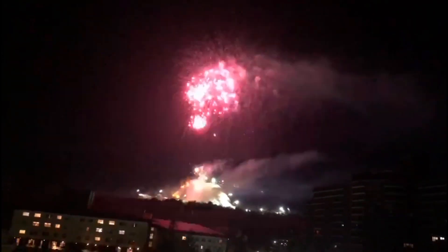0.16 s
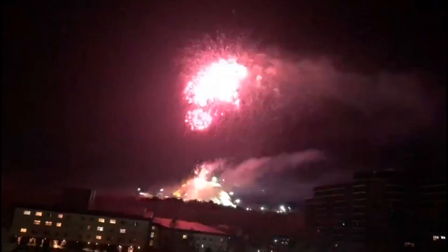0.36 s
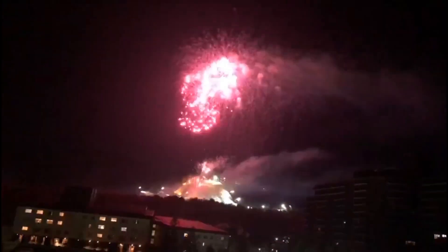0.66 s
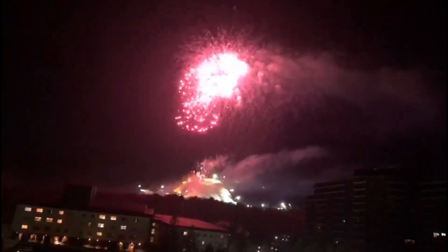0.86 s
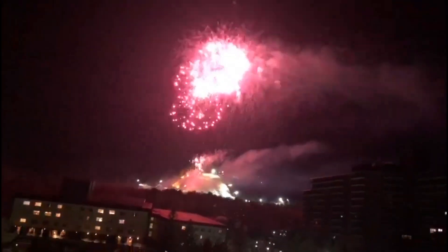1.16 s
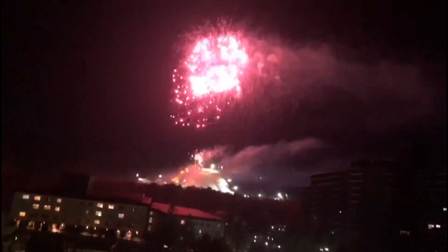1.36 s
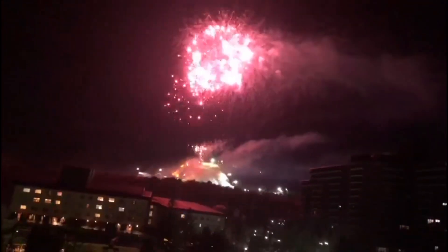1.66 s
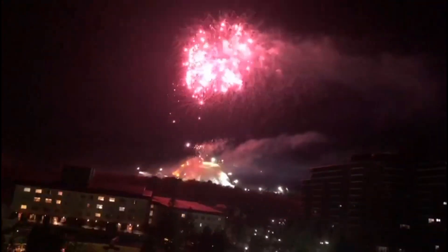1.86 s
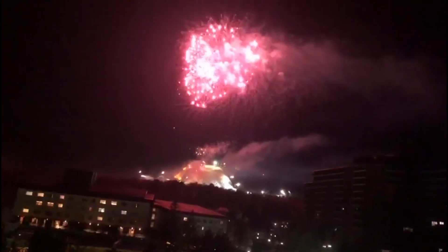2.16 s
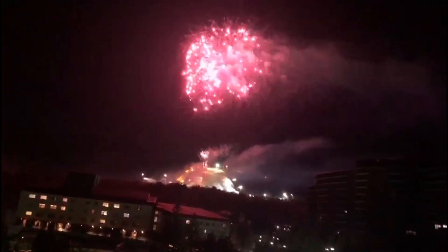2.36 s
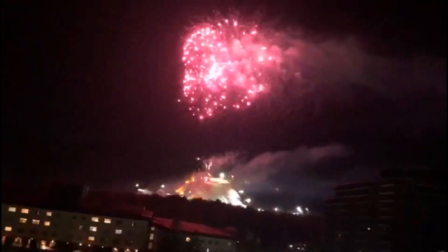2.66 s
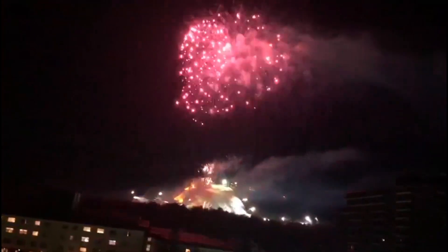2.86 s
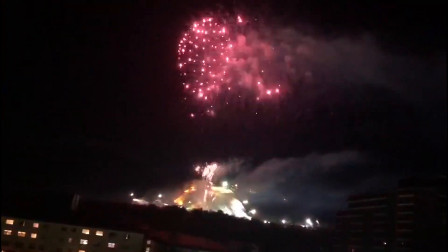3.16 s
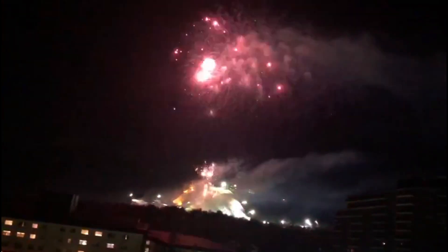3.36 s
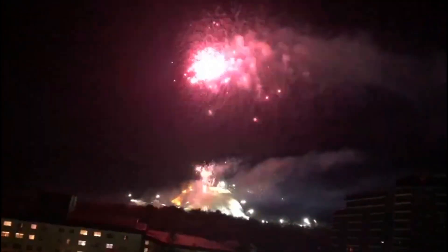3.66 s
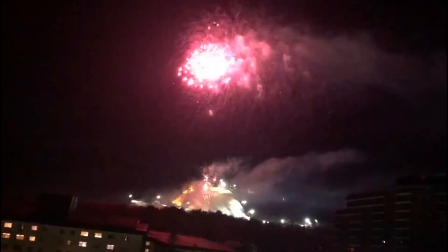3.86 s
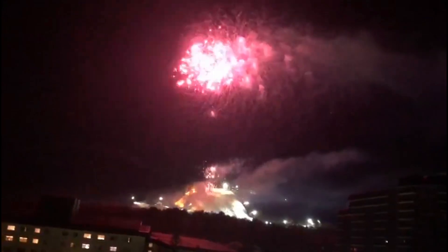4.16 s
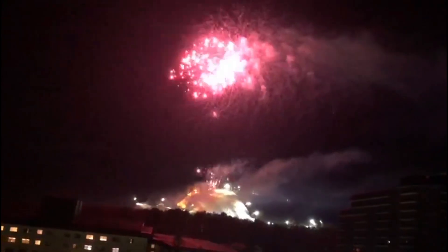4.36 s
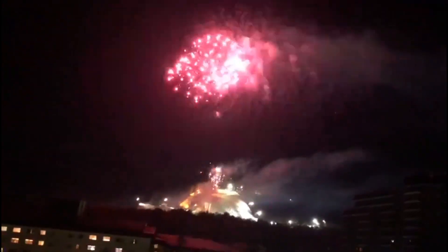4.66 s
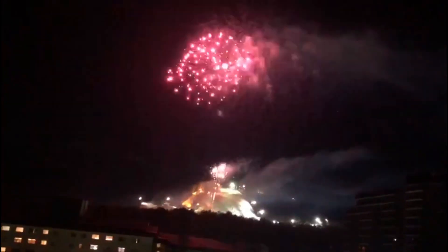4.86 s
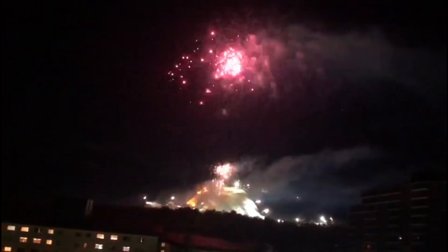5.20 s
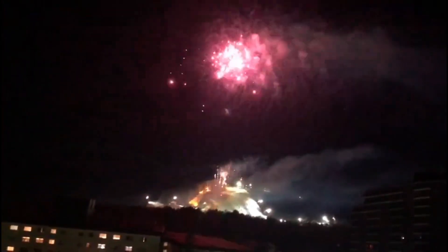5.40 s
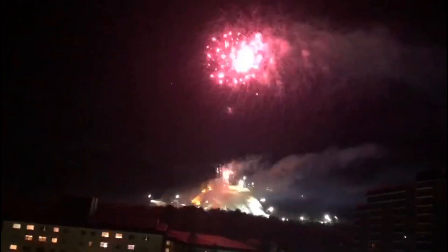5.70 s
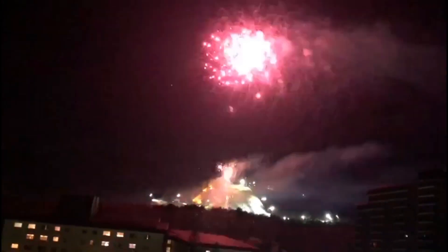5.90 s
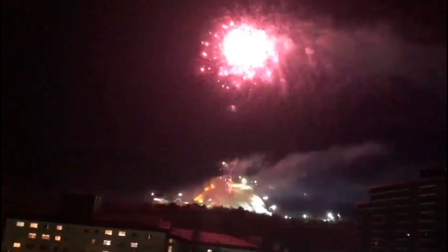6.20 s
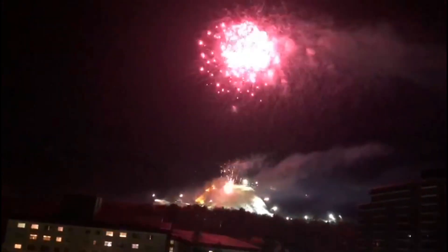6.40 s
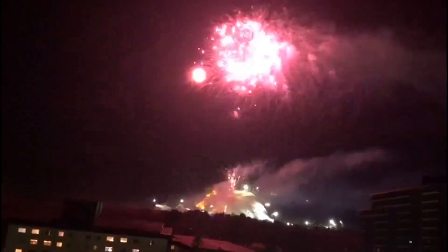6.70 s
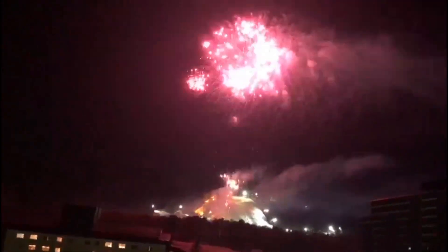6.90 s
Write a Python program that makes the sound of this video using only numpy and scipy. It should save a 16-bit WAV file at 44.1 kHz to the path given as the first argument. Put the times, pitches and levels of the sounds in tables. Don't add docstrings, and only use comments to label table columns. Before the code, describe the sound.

Distant firework shells burst with hard booming cracks over a night hillside, each rolling back off houses and slopes above a low valley rumble.

```python
import sys
import numpy as np
from scipy import signal
from scipy.fft import rfft, irfft, next_fast_len
from scipy.io import wavfile
from scipy.ndimage import uniform_filter1d, minimum_filter1d, map_coordinates

SR = 44100
rng = np.random.default_rng(int(sys.argv[2]) if len(sys.argv) > 2 else 0)


def wrap_up_sound(samples):
    columns = np.atleast_2d(samples).T
    tamed = np.clip(columns, -1, 1)
    steps = np.round(tamed * 32767).astype(np.int16)
    wavfile.write(sys.argv[1], SR, steps)


def invert_db(x):
    u = np.asarray(x, float) / 20
    return 10 ** u


N = 310464


def unit(x):
    return x / np.sqrt(np.mean(x ** 2) + 1e-20)


def along(points, hz):
    f, v = np.transpose(points)
    return np.interp(np.log(hz + 1), np.log(f + 1), v)


def wobble(rate, size):
    knots = rng.standard_normal(int(size * rate / SR) + 4)
    return map_coordinates(knots, [np.arange(size) * rate / SR])


def add(track, start_s, sound):
    track[round(start_s * SR):][:len(sound)] += sound


def tilted_db(spectrum, hz, tilt_db, bass_db):
    return along(spectrum, hz) + tilt_db * np.log2(1 + hz / 500) + bass_db / (1 + (hz / 200) ** 2)


def pulse(spectrum, tilt_db=0, bass_db=0, size=4096):
    hz = np.fft.rfftfreq(size, 1 / SR)
    cepstrum = irfft(np.log(invert_db(tilted_db(spectrum, hz, tilt_db, bass_db))))
    cepstrum[1:size // 2] *= 2
    cepstrum[size // 2 + 1:] = 0
    return irfft(np.exp(rfft(cepstrum)))


def noise(spectrum):
    hz = np.fft.rfftfreq(N, 1 / SR)
    return unit(irfft(rfft(rng.standard_normal(N)) * invert_db(along(spectrum, hz)), N))


# [Hz, dB per Hz]
RUMBLE_SPECTRUM = [(15, -49.5), (25, -36), (60, -4.5), (110, -6.5), (250, -1.5), (500, -4.5), (800, -16),
                   (1200, -26.5), (3000, -69), (22000, -120)]
# [Hz, dB per Hz]
RUSH_SPECTRUM = [(25, -65.5), (500, -26.5), (900, -0.5), (1600, -7.5), (2500, -25.5), (5000, -44),
                 (22000, -110)]


def valley():
    floor_db, fed_db, swell_s, linger_t60_s = -38, -31, 0.31, 3.67
    earlier_s, earlier_db = -0.68, 4
    t = np.arange(N) / SR
    lumps_db = 0.8 * wobble(14, N) + 1.3 * wobble(50, N)

    starts_s = np.array([earlier_s] + [burst[0] for burst in BURSTS])
    since_s = np.clip(t - starts_s[:, None], 0, None)
    fed = (1 - np.exp(-since_s / swell_s)) * invert_db(fed_db - 60 * since_s / linger_t60_s)
    fed[0] *= invert_db(earlier_db)
    level_db = 10 * np.log10(invert_db(2 * floor_db) + np.sum(fed ** 2, axis=0))

    rumble = invert_db(level_db + lumps_db) * noise(RUMBLE_SPECTRUM)
    rush_db = -53 + 1.6 * (level_db + 37) + 0.17 * lumps_db
    return rumble + invert_db(rush_db) * noise(RUSH_SPECTRUM)


# [Hz, dB]
SHOCK_SPECTRUM = [(30, -26), (70, -14), (140, -11), (250, -3), (400, 0), (800, -10), (1500, -13.5),
                  (3000, -28.5), (5000, -44), (8000, -66), (12000, -87), (22000, -115)]


def shock(tilt_db, bass_db=0):
    return pulse(SHOCK_SPECTRUM, tilt_db, bass_db)


# [Hz, dB per Hz]
ROLL_SPECTRUM = [(20, -46), (45, -24), (120, -2.5), (220, -2), (350, -9.5), (550, -9), (780, -17.5),
                 (1000, -18.5), (2700, -37.5), (5000, -56.5), (8000, -77.5), (22000, -120)]
# [Hz, s]
AIR_FADE = [(40, 6.5), (150, 2.64), (500, 3.28), (1500, 3.27), (4000, 1.65), (10000, 0.38)]
# [Hz, dB per tenfold delay]
PATH_LOSS = [(100, 14), (350, 8.5), (1500, 6)]
# [Hz, Hz, dB]
YARD_RINGS = [(129, 12, 6), (211, 60, 7), (328.3, 1.9, 13), (342, 12, 10), (1020, 190, 1.5)]


def roll(districts, tilt_db, bass_db, lumpy_db):
    size = 2 * SR
    thinning_s, answer_edge_s, fall_silent_s = 0.043, 0.0033, 0.018
    clumps_db = lumpy_db * wobble(70, size) + 0.6 * wobble(14, size) + 1.5 * wobble(500, size)
    clumped = rng.standard_normal(size) * invert_db(clumps_db)

    hz, t, z = signal.stft(clumped, SR, nperseg=512, noverlap=384)
    answer_db = -along(PATH_LOSS, hz)[:, None] * np.log10(1 + t / thinning_s)
    for start_s, end_s, level_db, bright_db in districts:
        opening = np.tanh((t - start_s) / answer_edge_s)
        closing = np.tanh((t - end_s) / fall_silent_s)
        colour_db = level_db + bright_db * np.log2((hz + 50) / 400)
        answer_db = answer_db + (opening - closing) / 2 * colour_db[:, None]
    roll_db = tilted_db(ROLL_SPECTRUM, hz, tilt_db, bass_db)[:, None]
    z = z * invert_db(answer_db + roll_db - 60 * t / along(AIR_FADE, hz)[:, None])
    echoes = signal.istft(z, SR, nperseg=512, noverlap=384)[1][:size]

    f = np.fft.rfftfreq(size, 1 / SR)
    ringing_db = sum(db / (1 + (2 * (f - centre) / width) ** 2) for centre, width, db in YARD_RINGS)
    t = np.arange(size) / SR
    edges = np.clip(t / 0.0036, 0, 1) ** 2 * np.clip((2 - t) / 0.46, 0, 1)
    return irfft(rfft(echoes) * invert_db(ringing_db), size) * edges


# [s, dB, dB per octave, 0-1 bounced off the street, s to the big facade and back]
BURSTS = [
    (0.3632, -1.5, -1.8, 0.13, .0518),
    (1.4316, -6.5, -0.9, 0.3, 0.043),
    (1.4872, -10.5, -1.9, 0.1, .0516),
    (1.871, -13, 7, 0, .051),
    (2.6887, -5, -4, 0, 0.047),
    (3.0744, -5.5, -1.6, 0.07, 0.054),
    (4.7504, -10.5, -1.16, 0.07, .0505),
    (4.7747, -11, -0.3, 0.2, 0.05),
    (6.3334, -11.5, -0.1, 0.37, 0.051),
    (6.838, -9.5, -0.95, 0.22, 0.053),
]
# [times the facade's delay, linear, dB per octave]
WALLS = [
    (0.05, 0.12, -1),
    (0.286, 0.25, -9),
    (.64, 0.15, -6),
    (1.0001, 0.44, -5.5),
    (1.129, 0.2, -4.5),
    (1.749, 0.13, -14),
    (3.549, .12, -5.5),
]
# [s, s, dB, dB per octave]
TOWN = [
    (.008, .035, 3, 0.7),
    (.044, .056, 6, 1.2),
    (.148, .19, 4.5, 1),
    (.25, .45, 1, 0.6),
]


def shells():
    air = np.zeros(N + 3 * SR)
    for start_s, peak_db, tilt_db, street, facade_s in BURSTS:
        bass_db = 1.35 * tilt_db - 0.65 * (peak_db + 4)
        add(air, start_s, invert_db(peak_db + 47) * shock(tilt_db, bass_db))

        echo_db = 0.15 * (peak_db + 8) - 0.18 * tilt_db + 3.3 * street
        echoes = invert_db(3 + echo_db) * roll(TOWN, 0.46 * tilt_db, bass_db, lumpy_db=0.44)
        add(air, start_s, echoes)
        add(air, start_s + 0.002023, np.clip(street, 0, 1) * echoes)

        for delay_ratio, strength, wall_db in WALLS:
            scatter_db = 1.8 * rng.standard_normal()
            level_db = 38 - 0.76 * wall_db + echo_db + scatter_db
            returned = shock(wall_db - 2.5 + 0.63 * tilt_db, 3.3)
            add(air, start_s + delay_ratio * facade_s, strength * invert_db(level_db) * returned)
    return air[:N]


# [s, dB peak, dB, dB]
LAUNCHES = [
    (1.381, -24, -13, -36),
    (3.045, -24, -14.5, -34),
    (3.384, -20, -17, -36),
    (3.975, -21, -14.5, -32.5),
    (5.737, -27, -15.5, -35),
]
# [Hz, dB]
THUMP_SPECTRUM = [(20, -32.5), (50, 4), (100, 6), (150, -5), (250, -26.5), (1000, -29), (22000, -110)]
# [s, dB]
HILLS = [
    (-.003, -3.3),
    (0.077, -10),
    (0.113, -11),
    (.145, -12),
]
# [s, s, dB, dB per octave]
SLOPES = [
    (.001, .02, 3, 1.2),
    (.06, .6, 3.4, .3),
]


def mortars():
    air = np.zeros(N + 3 * SR)
    for start_s, crack_db, thump_db, echo_db in LAUNCHES:
        add(air, start_s, invert_db(crack_db + 37.5) * shock(-0.4))
        for delay_s, hill_db in HILLS:
            level_db = thump_db + hill_db + 43.5 + rng.normal(0, 1.1)
            add(air, start_s + delay_s, invert_db(level_db) * pulse(THUMP_SPECTRUM))
        add(air, start_s, invert_db(echo_db + 18) * roll(SLOPES, 4.8, -1.5, lumpy_db=0.3))
    f, ground_hz = np.fft.rfftfreq(len(air), 1 / SR), 2300
    return irfft(rfft(air) / (1 + 1j * f / ground_hz) ** 3, len(air))[:N]


def scene():
    return (valley() + shells() + mortars())[None]


def top_cut(x):
    return signal.sosfilt(signal.butter(12, 14900, fs=SR, output="sos"), x)


# [Hz, dB per Hz]
HISS_SPECTRUM = [(25, -30), (2000, -6), (4000, 0), (8000, -3), (11500, -5.5), (12100, -19), (15000, -22),
                 (16000, -40), (22000, -50)]
CROSSOVERS = [55, 85, 144, 454, 792]


def record(dry):
    m = next_fast_len(N + SR // 2)
    f = np.fft.rfftfreq(m, 1 / SR)
    turn = np.ones(len(f), complex)
    for c in CROSSOVERS:
        turn *= (c * c - f * f - 1.24j * f * c) / (c * c - f * f + 1.24j * f * c)
    bass_cut = f ** 2 / (f ** 2 + 35 ** 2)
    x = -irfft(rfft(dry, m) * turn * bass_cut, m)[:, :N]

    limit_gain = np.minimum(1, 0.92 / (np.abs(x) + 1e-9))
    x = x * uniform_filter1d(minimum_filter1d(limit_gain, size=181), size=91)

    loudness = np.abs(uniform_filter1d(x ** 2, size=1024, origin=400))
    haze = 0.035 * invert_db(-19.5) * np.minimum(loudness, 0.03) ** 3
    hiss = np.sqrt(invert_db(-162) + haze) * noise(HISS_SPECTRUM)
    stop = np.sin(np.clip((N - np.arange(N)) / 160, 0, np.pi / 2)) ** 2
    return top_cut((x + hiss) * stop)


dry = scene()
out = record(dry)
wrap_up_sound(out)
```